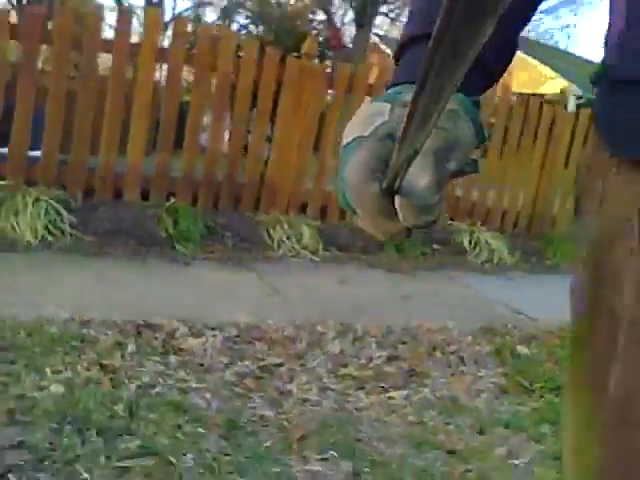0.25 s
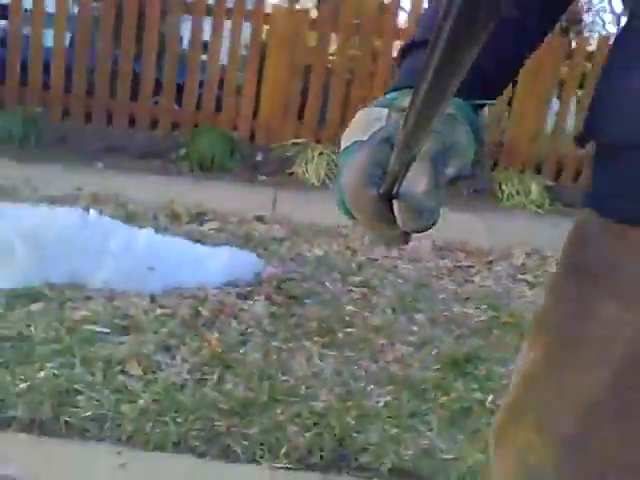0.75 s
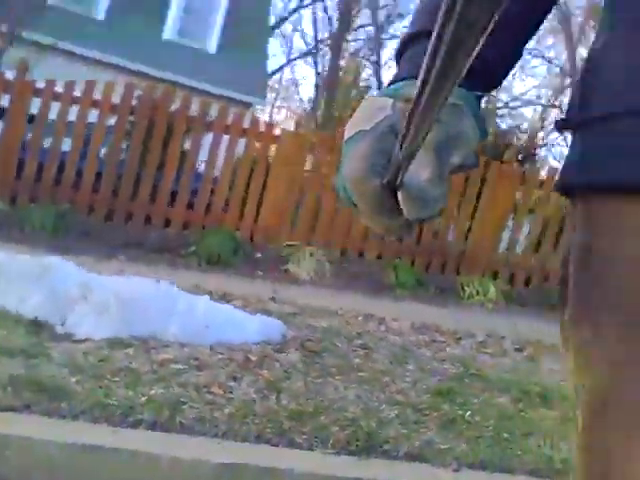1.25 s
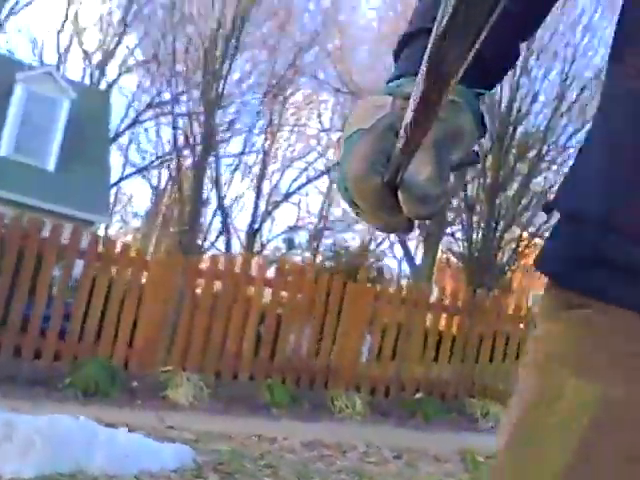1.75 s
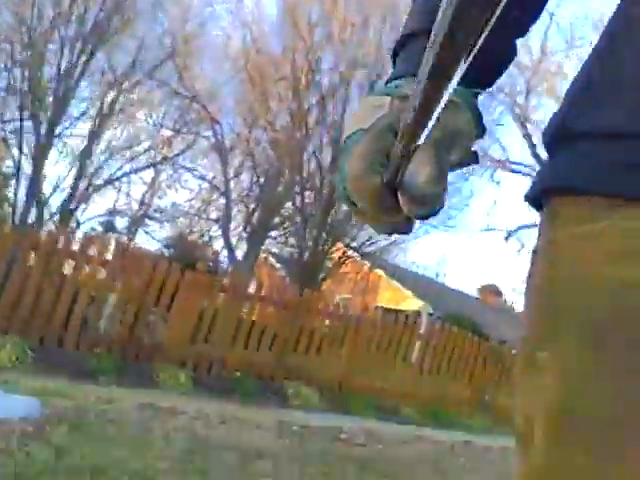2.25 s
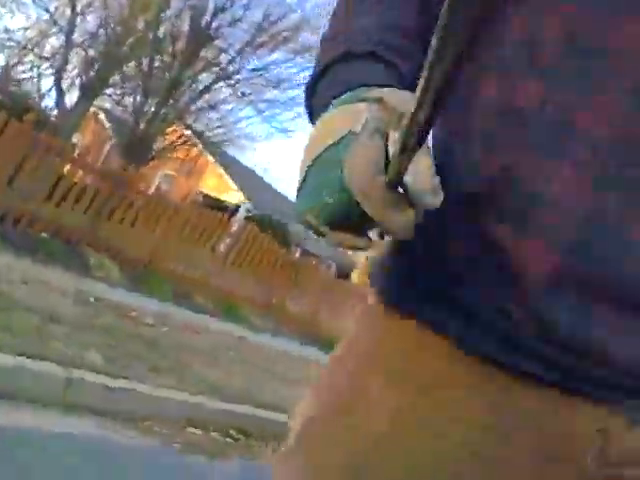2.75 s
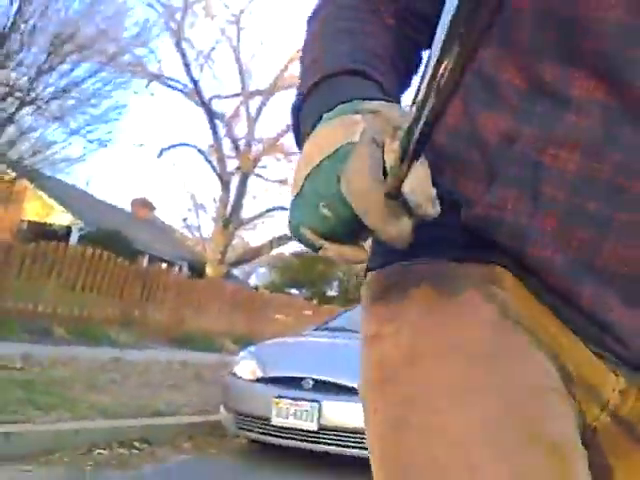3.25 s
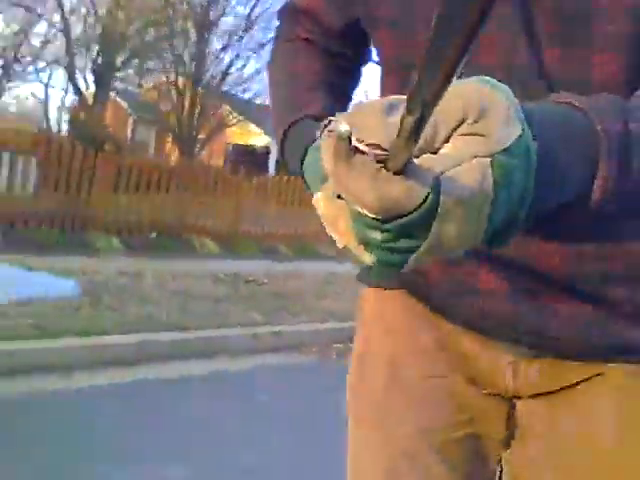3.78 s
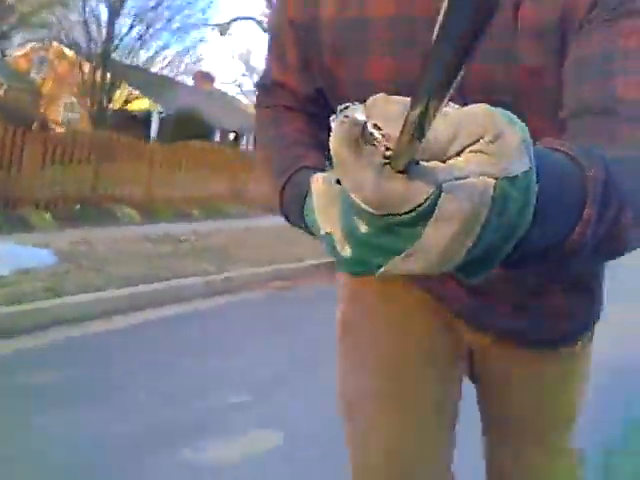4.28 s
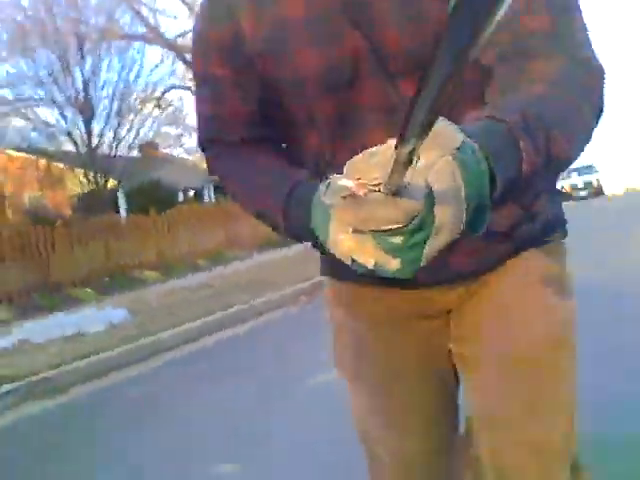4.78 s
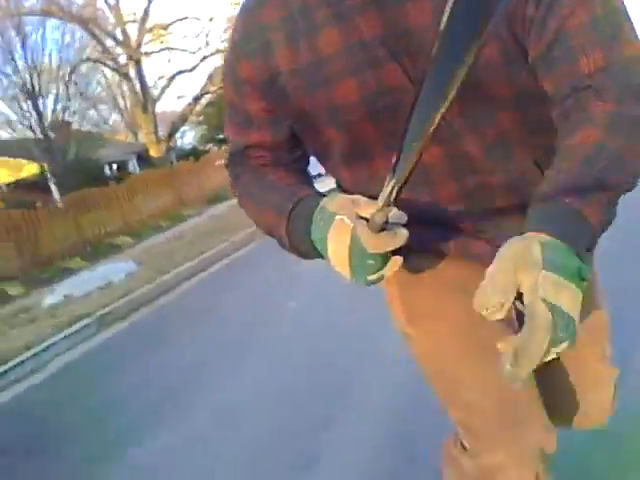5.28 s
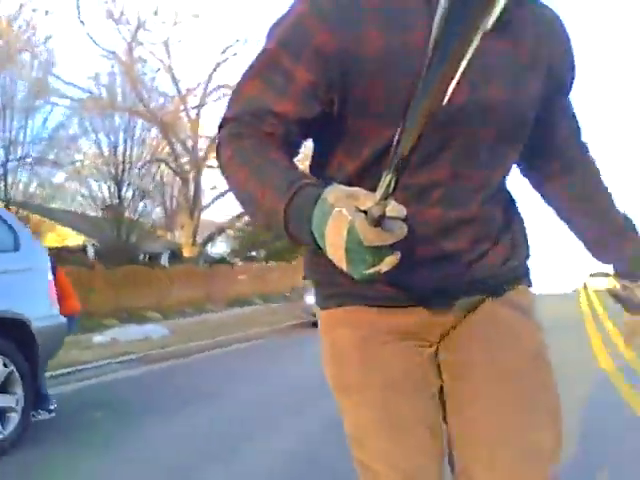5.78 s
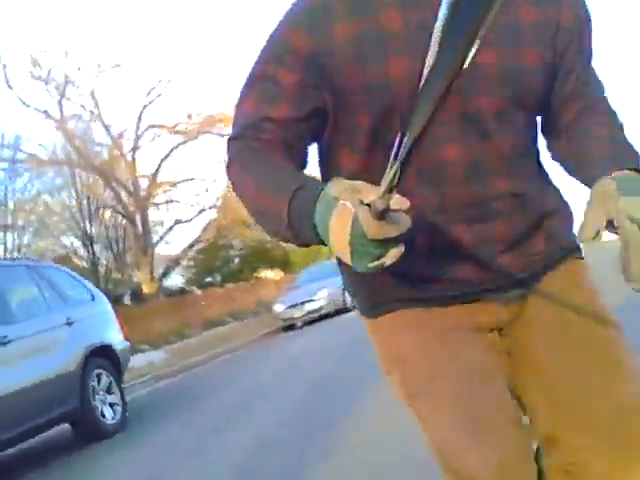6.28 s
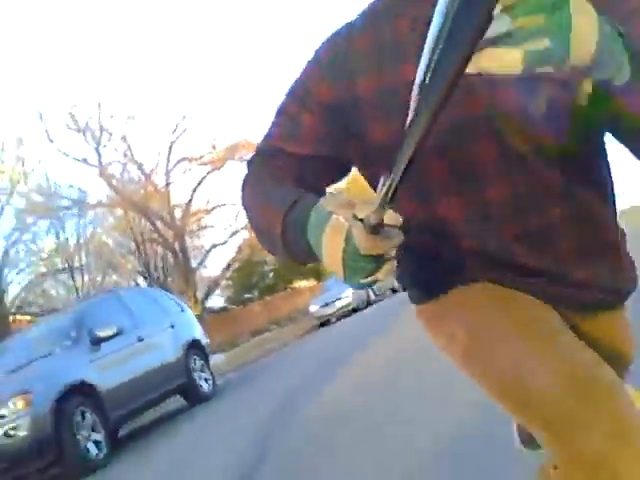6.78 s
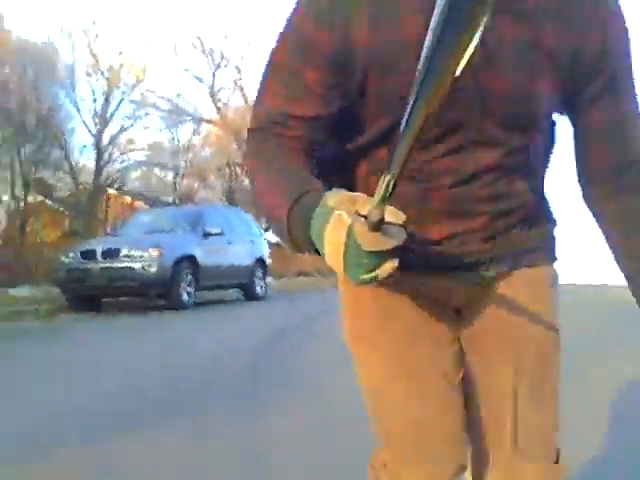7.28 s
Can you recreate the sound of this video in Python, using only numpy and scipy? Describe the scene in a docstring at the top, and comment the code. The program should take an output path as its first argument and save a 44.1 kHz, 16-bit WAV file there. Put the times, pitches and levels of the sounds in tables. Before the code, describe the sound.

For the first three seconds a car's engine hums low and its tyres hiss softly on a street, the hum sinking in pitch at about 1.5 seconds. Close to the microphone, sleeves brush lightly and the camera takes a small bump at 0.7 seconds. From 1.8 seconds the camera pole knocks and rattles in its loose mount, loudest between 2.4 and 3 seconds. The car fades by about 3.4 seconds, as skateboard wheels begin rolling on rough asphalt. A sharp tap hits the camera case at 3.6 seconds, followed by lighter taps, dull bumps and cloth swishes until about 5.3 seconds. The wheels' gritty roar grows with speed and is strongest from 6 seconds to the end, with wind thumping and rushing over the microphone. Two more taps come near 6.7 and 7.4 seconds, the last with a strong gust.

```python
"""First you hear a car's engine hum and its tyres hiss on a street; then the driver eases off.
Close by, a longboarder holds a camera on a pole: sleeves brush, taps and bumps shake the case,
and the pole knocks and rattles in its loose mount as the grip changes.
Then the board sets off. Stones in the asphalt strike the wheels, making a roar that grows with speed,
and swirling air buffets the microphone."""
import sys
import numpy as np
from scipy import signal
from scipy.fft import rfft, irfft, next_fast_len
from scipy.io import wavfile

SR = 44100
rng = np.random.default_rng(int(sys.argv[2]) if len(sys.argv) > 2 else 0)


def to_wav(s):
    """Save 16-bit WAV."""
    ch = np.atleast_2d(s).T  # columns
    pcm = np.round(np.clip(ch, -1, 1) * 32767)  # PCM
    wavfile.write(sys.argv[1], SR, pcm.astype(np.int16))


N = 332073
TIME = np.arange(N) / SR

# The car's engine. Each row: time in seconds, firing rate in Hz, level of the lowest tone in dB.
ENGINE = [(0, 72.9, -44.5), (.35, 71.7, -47.5), (.7, 71.4, -39), (1.25, 71.7, -44.5), (1.62, 53.34, -67),
          (2.0, 50, -52), (2.5, 49.1, -39), (3.5, 49.6, -58.5), (4.0, 48.8, -74)]
# Its tyres and the street. Each row: time in seconds, level in dB.
STREET_LEVEL = [(0, -39.5), (1.0, -37.5), (2.25, -37.5), (2.7, -39), (3.3, -42)]
# Air rushing round the camera. Each row: time in seconds, level in dB.
RUSH_LEVEL = [(5.9, -55), (6.266, -41), (6.912, -47), (6.976, -38), (7.38, -40), (7.388, -50), (7.398, -60),
              (7.53, -60)]
# Gusts and lulls. Each row: middle in seconds, half length in seconds, level change in dB.
GUSTS = [(4.08, .03, 8), (4.39, 0.019, 8.5), (4.6, 0.024, 7), (4.78, 0.027, 9.5), (4.92, 0.074, -6),
         (5.1, 0.037, 6), (5.39, .04, 6.5), (5.82, 0.087, 3.5), (6.18, .025, 5), (6.79, 0.021, 2.5),
         (7.365, 0.041, 11.5)]
# Sleeves and gloves brushing. Each row: middle in seconds, half length in seconds, sizzle level in dB.
SWISHES = [(.125, 0.038, -53), (1.168, 0.009, -55), (1.72, 0.015, -56), (3.818, 0.1, -67),
           (4.593, 0.018, -48.5), (4.747, 0.032, -52.5), (4.91, 0.045, -49.5), (5.319, 0.013, -42.5)]
# Taps on the camera case. Each row: start in seconds, strength in dB, hardness in dB.
TAPS = [(.663, -18, -7), (3.563, -1.5, 2), (7.386, -7, 14), (3.811, -10, -17), (4.172, -22, -26),
        (4.554, -19.5, 1), (4.669, -17, -12), (4.919, -17, -4), (4.981, -18, -5), (5.011, -18.5, 8),
        (5.037, -17, -8), (5.046, -13.5, -1), (6.712, -12, 13.5)]
# The tones of the tapped case. Each row: pitch in Hz, relative level in dB, fade time in seconds.
CASE_TONES = [(374, -17.5, 0.011), (615, -6, 0.029), (802, -4.5, 0.018), (1084, -8.5, 0.038),
              (1344, -11, 0.023)]
# Bumps that shake pole and camera. Each row: start in seconds, boom level in dB, thud level in dB.
THUMPS = [(.663, -32, -32.5), (1.65, -58, -38.5), (1.789, -21.5, -18), (2.036, -35, -32.5),
          (2.369, -36, -26), (3.348, -55, -34), (3.811, -40, -30.5), (4.171, -50, -36), (4.675, -32, -34),
          (4.769, -40, -32.5)]
# The pole knocking in its mount. Each row: start in seconds, strength of the low ring in dB,
# strength of the crack in dB, fade time of the rattle in seconds.
KNOCKS = [(1.788, -11, -14, 0.038), (1.798, -14, -12, 0.18), (1.832, -21.5, -13.5, .14),
          (2.037, -25.5, -24, 0.078), (2.228, -23.5, -25.5, 0.21), (2.319, -31.5, -34, 0.14),
          (2.368, 3, -5, .08), (2.394, -14.5, -12, 0.22), (2.43, -32, -15.5, 0.067),
          (2.462, -29, -23.5, .05), (2.494, -29, -24.5, 0.095), (2.561, -40, -36, 0.033),
          (2.688, -1, -13.5, .06), (2.717, -14, -14.5, .15), (2.748, -16, -20.5, 0.06),
          (2.815, -30, -29.5, .2), (2.885, -4.5, -17, 0.11), (2.929, -19, -27, 0.14),
          (2.971, -15, -20.5, 0.1), (3.047, -27.5, -32.5, 0.042), (3.154, -22.5, -33.5, 0.15),
          (3.251, -20, -39.5, 0.074), (3.348, -25, -33, .11)]
# The tones of pole and case, then of wheels and axles.
# Each row: pitch in Hz, width in Hz, relative level in dB.
POLE_TONES = [(172, 46, -27), (306, 110, -22), (520.6, 37, -10), (601, 35, -6), (768.3, 26, -5.5),
              (888, 88, -7.5), (1032, 72, -3.5), (1140, 88, -5.5), (1300, 170, -3.5), (1403, 68, -6),
              (1564, 120, -8.5), (1830, 73, -10), (2064, 89, -10), (2580, 300, -10), (2676, 68, -13),
              (2880, 160, -15), (3240, 92, -12), (3414, 350, -13), (4700, 2600, -2.5), (5350, 330, -4),
              (5940, 600, -10)]
WHEEL_TONES = [(537, 83, -18.5), (767, 30, -11.5), (976, 55, -13), (1284, 41, -14)]
# The board gathering pace. Each row: time in seconds, share of top speed.
SPEED = [(3.4, .31), (4.0, 0.38), (4.25, 0.48), (5.2, 0.71), (5.8, 0.74), (6.15, 0.96), (7.53, 1)]
# Rough and smooth asphalt. Each row: middle in seconds, half length in seconds, level change in dB.
ROAD_PATCHES = [(3.74, 0.077, 5.5), (4.35, 0.056, 4.5), (4.69, .04, 1.5), (5.05, 0.032, 6.5),
                (5.2, 0.032, 2.5), (6.28, 0.13, 0.5), (6.58, 0.075, -3.5), (7.49, .028, 3.5)]

# How deep or bright each noise is. Each row: frequency in Hz, relative level there in dB.
STREET_COLOUR = [(120, -6), (250, -7), (400, -5.5), (550, -4.5), (650, -2), (760, -3), (980, -0.5),
                 (1250, -5), (1800, -15.5), (2600, -23), (3400, -23.5), (4200, -34), (6300, -28.5),
                 (7000, -32.5)]
BUFFET_COLOUR = [(10, -5.5), (25, 0), (50, -5), (100, -8.5), (160, -10.5), (300, -20), (700, -44)]
FLUTTER_COLOUR = [(100, -18.5), (200, 2), (300, 7), (500, 1), (900, -14.5), (2000, -21)]
RUSH_COLOUR = [(700, -8), (1400, 4), (2000, 3.5), (2800, -3), (3400, -0.5), (4200, -14.5), (7000, -23.5)]
RUSTLE_COLOUR = [(1700, 12), (2600, -7), (3300, 4), (4200, -7), (6300, -9), (7000, -3)]
CRACK_COLOUR = [(1100, 2), (1600, 9.5), (2200, 1.5), (2800, -9), (3300, -1), (4000, -8)]
SNAP_COLOUR = [(3800, -11), (5000, 5), (6500, -2), (7200, -2)]
ROAR_COLOUR = [(90, -4.5), (220, -7), (400, -9.5), (570, 0.5), (670, -3), (760, -0.5), (850, -1), (980, 3),
               (1130, 1), (1300, 0), (1500, -6), (1850, -23), (3300, -32), (7000, -37.5)]
GRIT_COLOUR = [(1800, -35.5), (3200, -11), (4200, -13), (5000, -7.5), (5900, -2.5), (6600, -7), (7200, -12)]


def from_db(db):
    return 10 ** (np.asarray(db) / 20)


def unit_level(x):
    """Scale a signal so that its average power is 1."""
    return x / np.sqrt(np.mean(x ** 2) + 1e-20)


def curves(rows):
    """Join a table's rows with straight lines, giving each column a value at every sample."""
    times, *columns = np.transpose(rows)
    return [np.interp(TIME, times, column) for column in columns]


def fade_in(start_s, end_s):
    return np.clip((TIME - start_s) / (end_s - start_s), 0, 1)


def dying(t, fade_s):
    """Die away from 1. A fade time is how long a sound takes to drop by 60 dB."""
    return np.exp(-np.log(1000) * t / fade_s)


def swell(middle_s, half_s):
    """A smooth rise to 1 and back."""
    return np.exp(-.5 * np.minimum(((TIME - middle_s) / half_s) ** 2, 100))


def swells_db(rows):
    """The total level change from a table of swells."""
    return sum(db * swell(middle, half) for middle, half, db in rows)


def speed_doublings():
    """The board's pace: 0 at top speed, -1 at half, -2 at a quarter."""
    return np.log2(curves(SPEED)[0])


def drift(rate_hz):
    """A smooth random wander, typically 1 in size."""
    step, warm_up = 40, 2000
    r = np.exp(-2 * np.pi * step * rate_hz / SR)
    jitter = rng.standard_normal(N // step + warm_up + 2)
    slow = signal.lfilter([1], [1, -2 * r, r * r], jitter)[warm_up:]
    return np.interp(np.arange(N) / step, np.arange(len(slow)), unit_level(slow))


def coloured(x, colour):
    """Shape a sound with a colour table, falling 21 dB per octave past its ends; power 1."""
    size = next_fast_len(N)
    hz, db = np.transpose(colour)
    octave, listed = np.log2(np.arange(size // 2 + 1) * SR / size + 1), np.log2(hz)
    beyond = np.abs(octave - np.clip(octave, listed[0], listed[-1]))
    gain = from_db(np.interp(octave, listed, db) - 21 * beyond)
    return unit_level(irfft(rfft(x, size) * gain, size)[:N])


def noise(colour):
    return coloured(rng.standard_normal(N), colour)


def grains(per_s, spread_db):
    """Clicks at random moments, most small and a few large."""
    sizes = from_db(spread_db * np.minimum(rng.exponential(1, N), 4)) * rng.choice([-1, 1], N)
    return sizes * (rng.random(N) < per_s / SR)


def filtered(x, hz, kind):
    return signal.sosfilt(signal.butter(2, hz, kind, fs=SR, output="sos"), x + 1e-18)


def resonance(x, hz, width_hz):
    """Let through the part of a sound near one pitch."""
    r, angle = np.exp(-np.pi * width_hz / SR), 2 * np.pi * hz / SR
    feed = np.array([1, 0, -1]) * (1 - r * r) / 2
    return signal.lfilter(feed, [1, -2 * r * np.cos(angle), r * r], x + 1e-18)


def ring(clicks, hz, fade_s):
    """Each click starts a fading tone as tall as the click."""
    r, angle = dying(1 / SR, fade_s), 2 * np.pi * hz / SR
    return signal.lfilter([0, np.sin(angle)], [1, -2 * r * np.cos(angle), r * r], clicks + 1e-18)


def add(track, start_s, sound):
    at = round(start_s * SR)
    track[at:at + len(sound)] += sound[:N - at]


def car(cruise_hz=72, exhaust_hz=128.2, waver=0.0072):
    """The engine's firing makes a hum that sinks as the driver eases off; the tyre noise fades away."""
    firing_hz, lowest_db = curves(ENGINE)
    phase = 2 * np.pi * np.cumsum(firing_hz * (1 + waver * drift(3.9))) / SR
    near = 1 - fade_in(3.07, 3.42)
    # Overtones weaken as the engine slows, except where they make the exhaust ring.
    overtones = resonance(np.sin(2 * phase), exhaust_hz, width_hz=16.8) + from_db(-14) * np.sin(3 * phase)
    overtone_gain = near * from_db(-39.5 + 0.26 * (firing_hz - cruise_hz))
    hum = from_db(lowest_db) * np.sin(phase) + overtone_gain * overtones
    tyres = near * from_db(curves(STREET_LEVEL)[0]) * noise(STREET_COLOUR)
    return np.sqrt(2) * hum * from_db(drift(6)) + tyres


def wind(calm_db=-50.5, swirl_db=2.5):
    """Air rumbles faintly at first; with speed it thumps the microphone, flutters and rushes past."""
    moving, swirls = fade_in(3.1, 3.45), from_db(swirl_db * drift(22))
    pace, gust_db = speed_doublings(), swells_db(GUSTS)
    strength = moving * from_db(-30.5 + 9 * pace + gust_db) + (1 - moving) * from_db(calm_db)
    buffet = strength * noise(BUFFET_COLOUR)
    flutter = moving * from_db(-33.5 + 17.5 * pace + 0.73 * gust_db) * noise(FLUTTER_COLOUR)
    rush = fade_in(5.0, 5.7) * from_db(curves(RUSH_LEVEL)[0]) * noise(RUSH_COLOUR)
    return swirls * (buffet + flutter + rush)


def cloth_swishes(catch_db=3, sizzle_hz=5750, width_hz=800):
    """Cloth slides and catches: a soft rustle, and a sizzle from the weave that grows faster with force."""
    rustle = sum(swell(middle, half) * from_db(-33 + 0.35 * db) for middle, half, db in SWISHES)
    sizzle = sum(swell(middle, half) * from_db(db) for middle, half, db in SWISHES)
    hiss = resonance(rng.standard_normal(N), sizzle_hz, width_hz)
    weave = unit_level(resonance(hiss, sizzle_hz, width_hz))
    catching = from_db(catch_db * drift(90))
    return catching * (rustle * noise(RUSTLE_COLOUR) + sizzle * weave)


def case_taps():
    """Each tap gives a crack and a short ring of the camera case; harder taps snap more brightly."""
    clicks, cracks, snaps = np.zeros((3, N))
    t = TIME[:SR // 20]
    for start, strength_db, hard_db in TAPS:
        add(clicks, start, from_db([strength_db + 1]))
        add(cracks, start, from_db(strength_db - 18.5 + 0.24 * hard_db) * dying(t, 0.037))
        add(snaps, start, from_db(strength_db - 26 + hard_db) * dying(t, 0.0092))
    ringing = sum((-1) ** k * from_db(db) * ring(clicks, hz, fade_s)
                  for k, (hz, db, fade_s) in enumerate(CASE_TONES))
    return filtered(ringing, 1900, "low") + cracks * noise(CRACK_COLOUR) + snaps * noise(SNAP_COLOUR)


def thumps(boom_hz=62, thud_band_hz=(170, 480)):
    """A bump shakes pole and camera: a short low boom with a dull thud on top."""
    out, t = np.zeros(N), TIME[:SR // 3]
    for start, boom_db, thud_db in THUMPS:
        boom = np.sin(2 * np.pi * boom_hz * t) * dying(t, 0.22)
        thud = unit_level(filtered(rng.standard_normal(len(t)), thud_band_hz, "band")) * dying(t, 0.15)
        add(out, start, from_db(boom_db) * boom + from_db(thud_db) * thud)
    return out


def pole_ring(force, ring_db, crack_db, fizz_db):
    """Struck, the pole and case sound many tones: a low ring, a middle crack and a high fizz."""
    edges_hz, levels_db = [760, 2000, 3500, 4800], [ring_db, crack_db, crack_db, fizz_db]
    out = 0
    for k, (hz, width, db) in enumerate(POLE_TONES):
        share_db = np.interp(np.log(hz), np.log(edges_hz), levels_db)
        out = out + (-1) ** k * from_db(db + share_db) * unit_level(resonance(force, hz, width))
    return out


def pole_knocks(bounce_s=0.0049, bounces=24, contact_fade_s=0.021):
    """Each knock is one hard strike, then the loose mount chatters in gritty bounces that die away."""
    out, t = np.zeros(N), TIME[:SR // 4]
    for start, ring_db, crack_db, fade_s in KNOCKS:
        gaps = bounce_s * rng.uniform(0.58, 1.3, bounces)
        hit_times = np.r_[0, np.cumsum(gaps)]
        sizes = np.r_[1, from_db(3 * rng.standard_normal(bounces) - 5)] * dying(hit_times, fade_s)
        latest = np.searchsorted(hit_times, t, "right") - 1
        force = sizes[latest] * dying(t - hit_times[latest], contact_fade_s) * rng.choice([-1, 1], len(t))
        force[0] = 2.5  # the first hard strike
        fizz_db = crack_db - 12 + 0.3 * (ring_db - crack_db)
        add(out, start, from_db(-15) * pole_ring(force, ring_db, crack_db, fizz_db))
    return out


def mount_buzz(contacts_per_s=450, rattle_start_s=2.72, rattle_end_s=3.37):
    """Small quick contacts keep the pole ringing after each knock and through a steady rattle that slowly sinks
    away."""
    after_knocks = np.zeros(N)
    for start, ring_db, _, _ in KNOCKS:
        add(after_knocks, start, from_db(ring_db - 14) * dying(TIME[:SR], 0.33))
    rattling = (TIME >= rattle_start_s) * (1 - fade_in(rattle_end_s, rattle_end_s + 0.02))
    rattle = rattling * from_db(-28.5 - 13 * (TIME - rattle_start_s))
    contacts = grains(contacts_per_s, spread_db=3.5)
    return np.hypot(after_knocks, rattle) * pole_ring(contacts, ring_db=0, crack_db=-16, fizz_db=-18.5)


def wheels(top_stones_per_s=3000, roar_db=-26.5, grit_db=-48.5, db_per_doubling=10.5):
    """Stones in the asphalt strike the wheels, more often with speed; rough patches are louder."""
    pace = speed_doublings()
    stones_per_s = top_stones_per_s * 2 ** pace
    rolling = fade_in(3.2, 3.4) * from_db(0.9 * drift(20))
    stones = grains(stones_per_s, spread_db=2.5) / np.sqrt(stones_per_s)
    sand = grains(4 * stones_per_s, spread_db=6) / np.sqrt(stones_per_s)
    singing = sum(from_db(db) * unit_level(resonance(stones, hz, width)) for hz, width, db in WHEEL_TONES)
    roar = from_db(roar_db) * unit_level(coloured(stones, ROAR_COLOUR) + 0.5 * singing)
    grit = from_db(grit_db) * coloured(sand, GRIT_COLOUR)
    return rolling * from_db(db_per_doubling * pace + swells_db(ROAD_PATCHES)) * (roar + grit)


def scene():
    """All the sounds added into one channel."""
    mix = car() + wind() + cloth_swishes() + case_taps() + thumps()
    return (mix + pole_knocks() + mount_buzz() + wheels())[None]


def record(dry, cutoff_hz=6850):
    """The hardest knocks overload the small camera, which keeps no high treble."""
    treble_cut = signal.ellip(8, .3, 70, cutoff_hz, fs=SR, output="sos")
    return signal.sosfilt(treble_cut, np.clip(dry, -1, 1))


dry = scene()
out = record(dry)
to_wav(out)
```